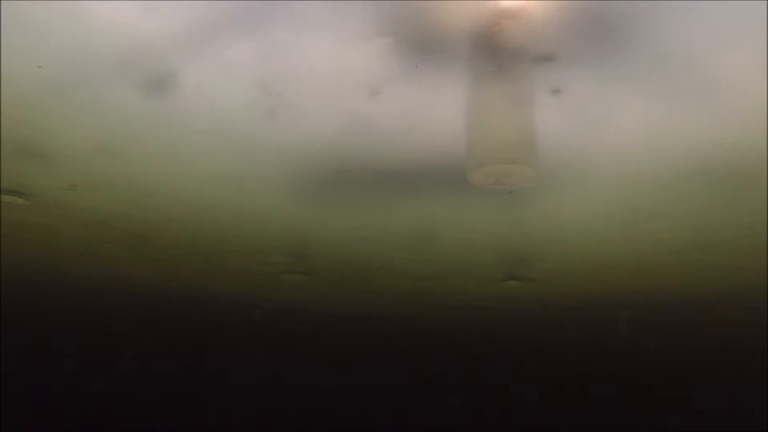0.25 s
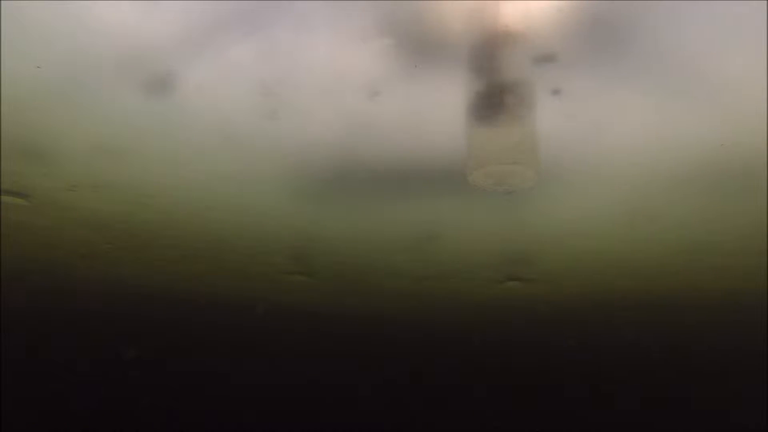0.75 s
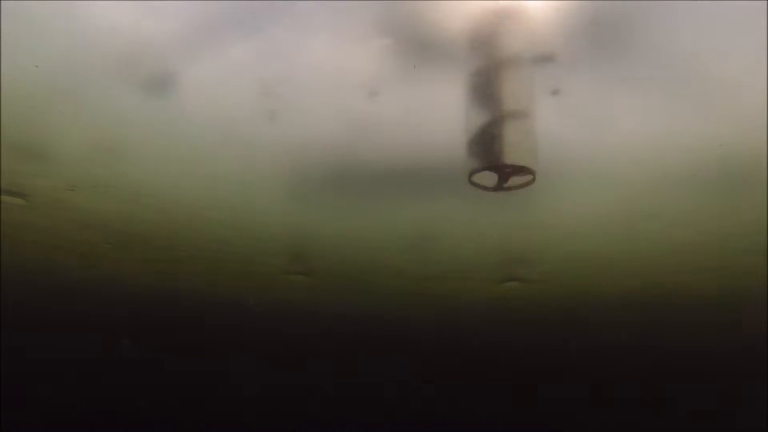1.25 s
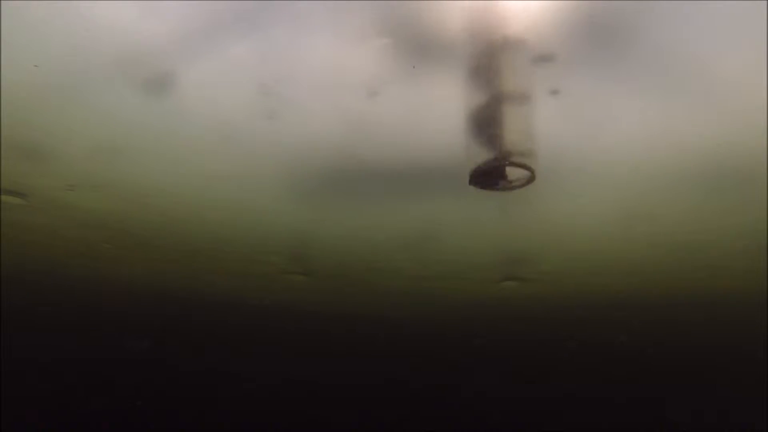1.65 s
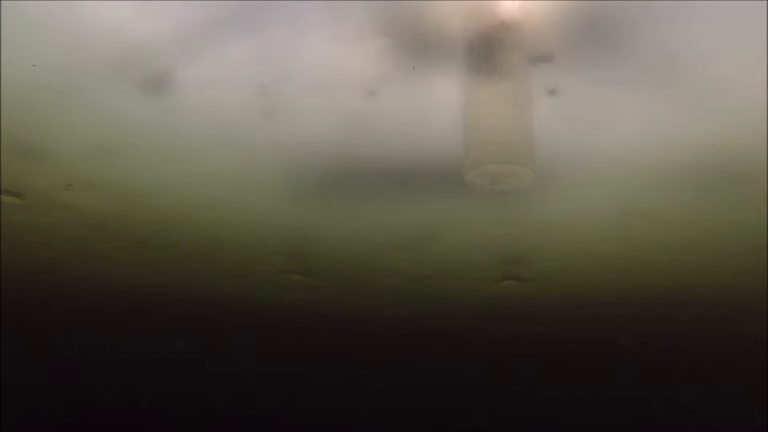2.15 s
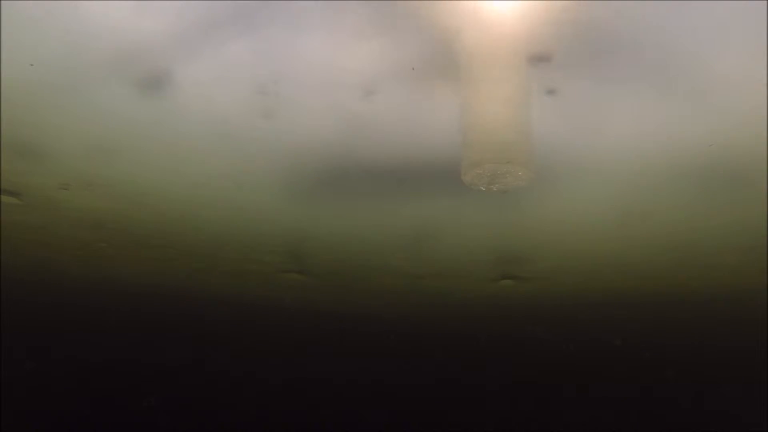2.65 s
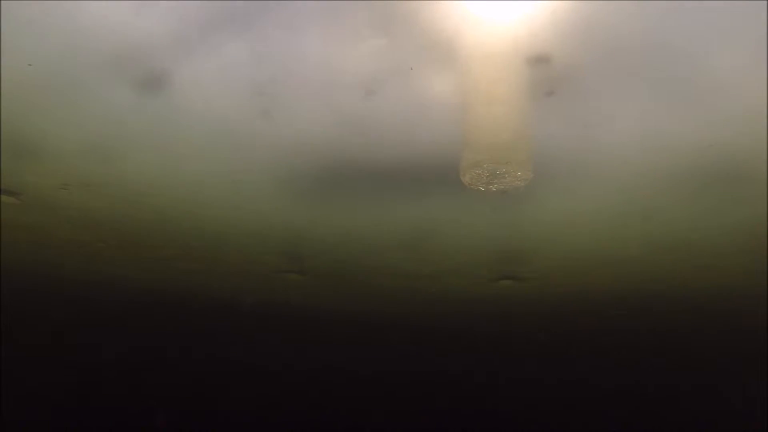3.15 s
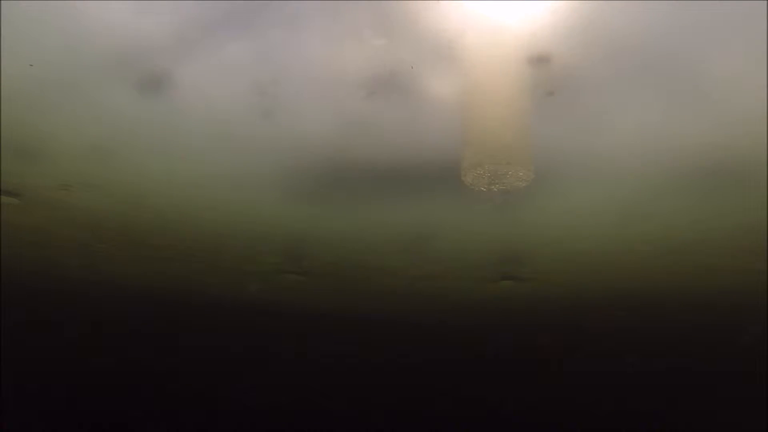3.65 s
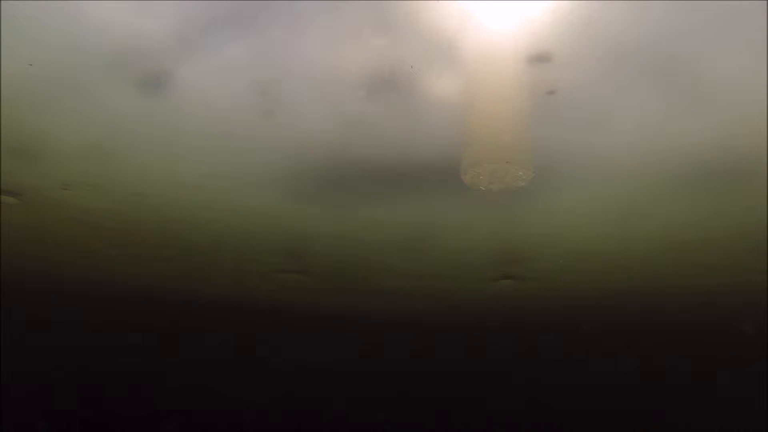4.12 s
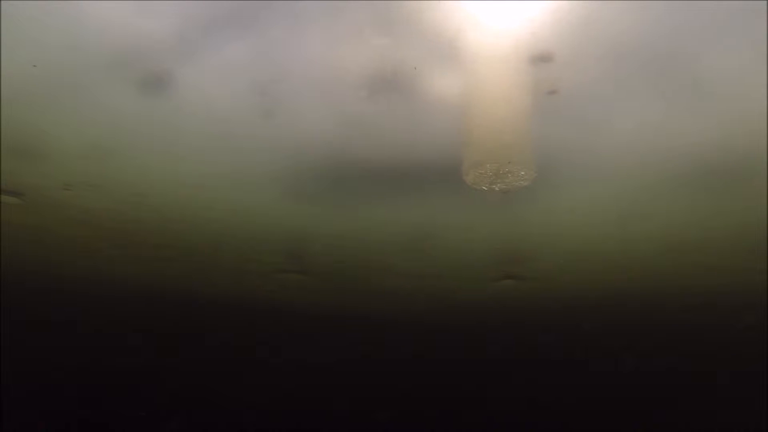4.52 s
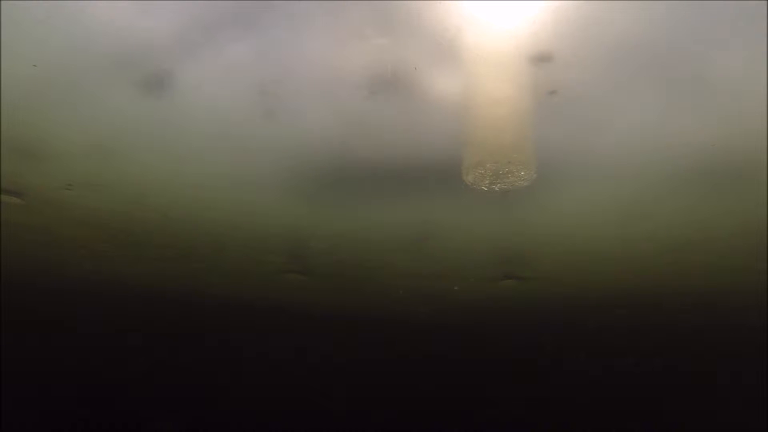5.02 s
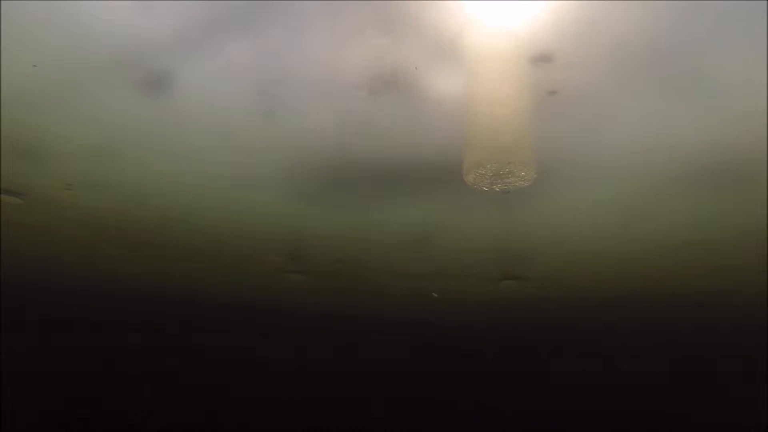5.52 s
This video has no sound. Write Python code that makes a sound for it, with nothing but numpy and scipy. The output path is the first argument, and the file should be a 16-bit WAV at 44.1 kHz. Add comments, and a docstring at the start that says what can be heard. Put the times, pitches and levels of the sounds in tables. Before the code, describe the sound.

Under lake ice, a cased underwater microphone hears a motor auger in its hole. From 0 to about 2.4 s the motor drones with a wavering gear whine, sagging in pitch near 0.4 s, recovering, sagging again near 1.8 s, then speeding up as it is freed. Water churns in thick, hollow gurgles around it, with irregular crunchy ice scrapes, bright crackles and round bubble plops. The loudest gulp and plops come at 1.6-2.1 s as the spiral is drawn back up. The motor dies quickly after 2.35 s, with a few small bubbles trailing. What remains is much quieter: soft lapping, faint fizzing slush with brief crackly swishes, strongest at 3.3-3.7 s. A dull, low knock on the case comes at 3.6 s with a tiny scrape. A deep, soft hum swells around 3.8, 4.3, 4.8 and 5.1 s. A small cluster of echoing bubbles glugs near 5.5 s, then near stillness.

```python
"""Under lake ice: a motor auger clears its hole, heard by a cased camera in the water below.
Motor harmonics drone and whine; filtered bubble clouds churn; bursts of clicks scrape the hole wall.
The spiral is drawn out. Slush, made of dense clicks, hisses over lapping water and something knocks.
A low harmonic hum comes and goes, and a last few bubbles glug as decaying sines with echoes."""
import sys
import numpy as np
from scipy import signal
from scipy.fft import rfft, irfft
from scipy.io import wavfile
from scipy.ndimage import uniform_filter1d

SR = 44100
rng = np.random.default_rng(int(sys.argv[2]) if len(sys.argv) > 2 else 0)


def bounce(signal):
    """Save signal as a 16-bit WAV file at the path given by the first command-line argument."""
    frames = np.transpose(np.atleast_2d(signal))
    limited = np.clip(frames, -1, 1)
    pcm = np.round(limited * 32767).astype(np.int16)
    wavfile.write(sys.argv[1], SR, pcm)


N = 254898
TIME_S = np.arange(N) / SR

# Levels are relative: each layer also has mix gains in its function.
# Quiet lake spectrum: freq_hz, level_db
FLOOR_COLOUR = [(20, -24), (60, 2.5), (200, -3.5), (700, -14), (2800, -23.5), (4000, -28.5), (8000, -40.5),
                (15000, -44)]
# Faint sub-bass tone: pitch_hz, level_db
THROB = (19, -46.5)
FLOOR_DB = -51

# Swells of the late hum: start_s, length_s, level_db
HUM_SWELLS = [(3.83, 0.34, -36), (4.31, 0.31, -37.5), (4.83, 0.103, -36.5), (5.06, 0.52, -40.5)]
# Hum harmonics: multiple, level_db
HUM_ORDERS = [(1, 1), (2, -10), (3, -42)]
HUM_HZ, HUM_SETTLES_HZ, HUM_SETTLES_S = 51.8, 50.5, 4.2

# Surges of loose slush in the hole: start_s, length_s, level_db
SWISHES = [(2.25, 0.053, -44.5), (2.49, 0.13, -48), (2.825, 0.12, -43), (3.085, 0.07, -52),
           (3.23, 0.063, -43.5), (3.3, 0.087, -36.5), (3.585, 0.049, -36.5), (3.74, 0.025, -36),
           (3.99, 0.058, -43.5), (4.115, 0.036, -44.5), (4.19, 0.13, -49), (4.94, 0.15, -48.5),
           (5.165, 0.074, -44), (5.305, 0.018, -39)]
# Slush spectrum: freq_hz, level_db
SLUSH_COLOUR = [(40, -64), (170, -2), (300, -2), (600, -8), (850, -1.5), (1300, -4), (2000, -2.5),
                (3000, -1), (3900, -32), (5500, -29.5), (9000, -48.5), (12500, -43), (15000, -40.5)]
# Water lapping in the hole: time_s, level_db
LAPPING = [(2.7, -46), (3.051, -52), (3.28, -41.5), (3.48, -65.5), (3.7, -46), (4.25, -41), (4.799, -47.5),
           (5.5, -41.5), (5.78, -52.5)]
# Lapping spectrum: freq_hz, level_db
LAPPING_COLOUR = [(30, 0), (90, 1), (200, -7.5), (350, 1), (600, -3.5), (900, -6), (1400, -11), (2200, -17),
                  (4000, -58.5)]
FIZZ_DB, SETTLED_S = -56, 5.52  # faint fizz between surges, until the slush has settled

# Push on the case: start_s, level_db, push_s
KNOCK = (3.5932, -8.5, 0.0012)

# Largest single bubbles: start_s, level_db, pitch_hz
GLUGS = [(0.094, -5, 597), (0.098, -1, 357), (0.589, -2, 396), (1.251, -2, 588), (1.268, -4.5, 572),
         (1.35, -4, 572), (1.515, -4.5, 549), (1.595, -5, 575), (1.703, -2, 554), (1.727, -13, 537),
         (1.89, -1, 694), (1.919, -2.5, 604), (1.944, -12, 564), (1.974, -7.5, 710), (2.064, -7, 569),
         (2.425, -16.5, 922), (2.468, -19.5, 963), (2.492, -16, 639), (2.514, -32, 662),
         (2.556, -18.5, 525), (2.686, -34, 653), (2.69, -23.5, 329), (2.845, -27.5, 654), (3.193, -35, 597),
         (3.467, -32.5, 673), (3.526, -32.5, 650), (3.807, -30, 697), (4.257, -28, 715), (5.435, -30, 656),
         (5.459, -19, 620), (5.466, -19.5, 678), (5.479, -17.5, 490), (5.486, -24, 565), (5.502, -21, 678),
         (5.567, -24.5, 640), (5.609, -39.5, 1090), (5.616, -45, 1620), (5.718, -51, 2150)]
# Echoes between ice sheet and lake bed: delay_s, share (signed gain)
ECHOES = [(.0065, 0.16), (.0118, -0.17), (.019, 0.53)]

# Ice scraping on ice and steel: start_s, length_s, level_db, bite_db (extra treble)
SCRAPES = [(0.027, 0.011, -18, -2.5), (0.06, 0.05, -24, -9), (0.153, 0.046, -32.5, 0.5),
           (0.191, 0.012, -25.5, -3), (0.274, 0.026, -28, 3.5), (0.375, 0.0071, -28, -6),
           (0.464, 0.025, -23.5, 0.5), (0.504, 0.04, -27.5, 2.5), (0.576, 0.019, -18, -7),
           (0.642, 0.026, -21, -3), (0.75, 0.034, -27, -0.5), (0.843, 0.039, -31.5, 1),
           (1.022, 0.063, -32, -7), (1.084, 0.08, -17.5, -2.5), (1.229, 0.036, -26, 2.5),
           (1.346, 0.0062, -23.5, 2), (1.399, 0.021, -28.5, -8.5), (1.441, 0.018, -27, 0),
           (1.489, 0.046, -27, -10), (1.587, 0.017, -17.5, -5), (1.636, 0.017, -20.5, -2.5),
           (1.67, 0.011, -20, 5.5), (1.746, 0.0053, -26, 0), (1.772, 0.025, -20.5, 2),
           (1.884, 0.018, -18, -8.5), (1.915, 0.027, -24.5, -7), (1.965, 0.032, -21.5, -9),
           (2.055, 0.017, -24, -5), (2.123, 0.023, -24, 4), (2.188, 0.04, -27, 2),
           (2.343, 0.0054, -26.5, 8), (2.41, 0.016, -25, 4.5), (2.46, 0.018, -32, -6),
           (3.567, 0.019, -32.5, -9), (3.604, 0.091, -36, -4.5), (3.591, 0.011, -29, 4.5),
           (3.733, 0.034, -38, -7), (4.252, 0.014, -33, -3)]
# Scrape spectrum: freq_hz, level_db
SCRAPE_COLOUR = [(40, -20), (170, -10), (300, 1), (600, -3.5), (850, -1.5), (1300, -3), (2000, -6),
                 (3000, -1.5), (3900, -26.5), (5500, -25), (9000, -37.5), (13000, -33.5), (15000, -50)]
# Ringing ice chips: pitch_hz, level_db
CHIPS = [(1560, -8), (2650, -13)]

# Auger motor speed, sagging under load: time_s, rate_hz
MOTOR_SPEED = [(0.0, 91.47), (0.4, 68.53), (0.8, 73.63), (1.05, 83.8), (1.48, 83.77), (1.81, 71.97),
               (2.02, 82.66), (2.25, 92.7), (2.56, 104.4)]
# Gear whine harmonics of the turning rate: multiple, level_db
WHINE_ORDERS = [(3, -20), (4, -8), (5, -2), (6, -7), (7, -1.5), (8, -12), (9, -18.5), (11, -23.5),
                (14, -21)]
LOUD_RATE_HZ = 85.9  # no sag loss from this speed up
LIFT_S, LIFT_TAKES_S = 1.7, 0.16  # spiral pulled back up into the hole; centre of the change
STOP_S, STOP_DB_PER_S = 2.35, 130  # motor dies away

# Water stirred by the spiral and its trapped air pocket: time_s, level_db, pitch_hz
CHURN = [(0.0, -19, 608), (0.55, -18.5, 668), (0.899, -19, 651), (1.25, -17, 591), (1.701, -15, 557),
         (1.83, -16.5, 655), (2.06, -23, 633), (2.24, -20.5, 686), (2.42, -24.5, 584), (2.721, -45, 609.5)]
# Churn spectrum: freq_hz, level_db
CHURN_COLOUR = [(30, -26.5), (90.0, -7), (170.0, -15), (300.0, -6.5), (600.0, -8), (850.0, -7),
                (1300.0, -16), (2000.0, -21), (3000.0, -23), (3900.0, -51.5), (5500.0, -56),
                (9000.0, -70.5), (13000.0, -67), (15000.0, -78.5)]
# Big gulps of air dragged under: start_s, length_s, level_db
GULPS = [(0.03, 0.025, -28), (0.21, 0.12, -28), (0.58, 0.12, -18.5), (1.635, 0.077, -11.5),
         (1.74, 0.13, -19.5), (1.91, 0.09, -20), (2.08, 0.053, -24), (2.19, 0.065, -28)]
WAKE_DB, LIFTED_WAKE_DB = -1.5, 2.5  # surge behind each scrape, relative to it; extra once lifted

# Camera case resonances, for churn, scrapes and slush: centre_hz, half_width_hz, gain_db
CASE = [(153.6, 28.5, 10.5), (326.6, 14.5, 1), (424.4, 57, 4), (588, 56.4, 8.5), (664.6, 34.6, 12),
        (763, 57.6, 5.5), (971, 17.6, 6.5), (1187, 56, 7), (1513, 45, 10), (1654, 65, 7.5), (2058, 65, 4.5),
        (2223, 34, 7.5), (2456, 56, 5.5), (2660, 54, 3.5), (3215, 58, 5.5), (3540, 67, 5.5), (4094, 120, 7),
        (4480, 790, 7), (6360, 300, 12), (7780, 560, 7.5), (9330, 470, 12), (12400, 490, 7.5)]
EDGE_HZ = 15300


def amp(db):
    """Amplitude ratio from dB."""
    return 10 ** (np.asarray(db) / 20)


def evened(x):
    """Scales to unit RMS."""
    return x / np.sqrt(np.mean(x ** 2) + 1e-20)


def add(mix, start_s, sound):
    """Adds a sound in place, cut at the end of the mix."""
    part = mix[max(round(start_s * SR), 0):][:len(sound)]
    part += sound[:len(part)]


def level(time_s, db):
    """Gain along a dB curve, fading out beyond its ends."""
    outside_s = np.maximum(time_s[0] - TIME_S, 0) + np.maximum(TIME_S - time_s[-1], 0)
    return amp(np.interp(TIME_S, time_s, db)) * np.exp(-outside_s / 0.14)


def ramp(centre_s, takes_s):
    """Linear rise from 0 to 1 around a moment."""
    return np.clip((TIME_S - centre_s) / takes_s + 0.5, 0, 1)


def strokes(rows, attack_s, slope_db, release_s, attack_share=0):
    """Gain of events that rise, tilt by slope_db and die away; attack_share slows long ones."""
    out = np.zeros(N)
    for start_s, length_s, db in rows:
        rise_s = attack_s + attack_share * length_s
        t = np.arange(-rise_s / 2, length_s + 10 * release_s, 1 / SR)
        hold = amp(db + slope_db * np.clip(t / length_s, 0, 1))
        attack = np.clip(t / rise_s + 0.5, 0, 1)
        release = np.exp(-np.maximum(t - length_s, 0) / release_s)
        add(out, start_s - rise_s / 2, hold * attack * release)
    return out


def wander(rate_hz):
    """Slow random drift of about unit size, bounded to +-2."""
    rolloff = 1 + (np.fft.rfftfreq(N, 1 / SR) / rate_hz) ** 4
    drift = evened(irfft(rfft(rng.standard_normal(N)) / rolloff, N))
    return 2 * np.tanh(drift / 2)


def band(x, lo_hz, hi_hz):
    """Butterworth band-pass."""
    edges_hz = [lo_hz, min(hi_hz, SR * 0.49)]
    return signal.sosfilt(signal.butter(3, edges_hz, "band", fs=SR, output="sos"), x)


def through_case(x, colour):
    """Minimum-phase filter: a broad colour plus the ringing of the case."""
    freq_hz = np.fft.rfftfreq(8192, 1 / SR)
    colour_hz, colour_db = np.transpose(colour)
    db = np.interp(np.log(freq_hz + 1), np.log(colour_hz), colour_db)
    for centre_hz, half_width_hz, gain_db in CASE:
        db = db + gain_db * np.exp(-((freq_hz - centre_hz) / half_width_hz) ** 2)
    log_gain = np.log(amp(np.r_[db, db[-2:0:-1]]))
    taps = np.fft.ifft(np.exp(np.conj(signal.hilbert(log_gain)))).real
    return signal.oaconvolve(x, taps[:len(freq_hz)])[:N]


def steadied(x, lo_hz, hi_hz, span_s):
    """Scales x to unit running level within a band."""
    size = max(int(span_s * SR), 2)
    power = uniform_filter1d(uniform_filter1d(band(x, lo_hz, hi_hz) ** 2, size), size)
    return x / np.sqrt(abs(power) + 1e-20)


def clicks(per_s, spread_db):
    """Random snaps of either sign, their dB levels spread by an exponential draw."""
    size = amp(spread_db * np.minimum(rng.exponential(1, N), 4))
    return size * rng.choice([-1, 1], N) * (rng.random(N) < per_s / SR)


def bubble(pitch_hz, cycles, rise, swell_cycles=0.29):
    """A bubble swells, then rings for a few cycles, its pitch climbing."""
    turns = np.arange(int(8 * cycles / pitch_hz * SR)) * pitch_hz / SR
    ring = np.sin(2 * np.pi * turns * (1 + rise * turns / cycles))
    return ring * np.exp(-turns / cycles) * (1 - np.exp(-turns / swell_cycles))


def bubbles(lo_hz, hi_hz, per_s, cycles, spread_db, count):
    """A cloud of bubbles of `count` sizes between two pitches, at unit RMS."""
    cloud = np.zeros(N)
    for pitch_hz in np.geomspace(lo_hz, hi_hz, count):
        births = clicks(per_s / count, spread_db) * pitch_hz
        cloud += signal.oaconvolve(births, bubble(pitch_hz, cycles, rise=0.013))[:N]
    return evened(cloud)


def tone(rate_hz, orders, waver, flutter_db):
    """Harmonics of a wavering rate, each fluttering in level."""
    turns = np.cumsum(rate_hz * (1 + waver * wander(16.3))) / SR
    out = np.zeros(N)
    for multiple, db in orders:
        gain = amp(db + flutter_db * wander(12))
        out += gain * np.sin(2 * np.pi * (round(multiple) * turns + rng.random()))
    return out


def resonate(x, pitch_hz, width_hz):
    """A one-pole resonance that follows the curve pitch_hz."""
    turn = np.exp(2j * np.pi * np.cumsum(pitch_hz) / SR)
    pole = np.exp(-np.pi * width_hz / SR)
    return 2 * (turn * signal.lfilter([1 - pole], [1, -pole], x / turn)).real


def scattered(x, t60_s, wet_db):
    """Rough ice scatters each sound into a short diffuse tail."""
    t = np.arange(SR // 5) / SR
    tail = rng.standard_normal(len(t)) * amp(-60 * t / t60_s)
    return x + amp(wet_db) * signal.oaconvolve(x, tail / np.linalg.norm(tail))[:N]


def floor():
    """The quiet lake: coloured noise with a faint throb at the very bottom."""
    colour_hz, colour_db = np.transpose(FLOOR_COLOUR)
    freq_hz = np.fft.rfftfreq(N, 1 / SR)
    colour = amp(np.interp(np.log(freq_hz + 1), np.log(colour_hz), colour_db))
    hush = evened(irfft(rfft(rng.standard_normal(N)) * colour, N))
    throb_hz, throb_db = THROB
    throb = np.sin(2 * np.pi * np.cumsum(throb_hz * (1 + 0.056 * wander(9.6))) / SR)
    return amp(FLOOR_DB) * hush + amp(throb_db + 2 * wander(2)) * throb


def hum():
    """Low, wavering harmonics that come and go after the motor has stopped."""
    pitch_hz = HUM_HZ + (HUM_SETTLES_HZ - HUM_HZ) * ramp(HUM_SETTLES_S, 0.1)
    drone = tone(pitch_hz, HUM_ORDERS, waver=0.016, flutter_db=1.0)
    return amp(2.5) * strokes(HUM_SWELLS, attack_s=0.22, slope_db=-0.6, release_s=0.059) * drone


def slush():
    """Ice crumbs rub and crackle, brighter when they rush, while water laps and burbles."""
    surge = strokes(SWISHES, attack_s=0.038, slope_db=-1.5, release_s=0.012)
    bed = level([STOP_S, SETTLED_S], [FIZZ_DB, FIZZ_DB])
    crumbs = clicks(per_s=3000, spread_db=3)
    fizz = steadied(through_case(crumbs, SLUSH_COLOUR), 1460, 4100, span_s=0.16)

    treble = evened(band(clicks(per_s=6000, spread_db=4), 4000, 12000))
    rush = surge * (surge / surge.max()) ** 0.21 * treble  # grows faster than the surge

    burble = bubbles(280, 1400, per_s=500, cycles=6, spread_db=2.3, count=24)
    water = band(evened(rng.standard_normal(N)) + amp(-12.5) * burble, 35, 8000)
    lap = steadied(through_case(water, LAPPING_COLOUR), 460, 1300, span_s=0.16)
    lap_gain = np.hypot(level(*np.transpose(LAPPING)), amp(-6.5) * surge)
    return amp(0.5) * np.hypot(surge, bed) * fizz + amp(-26.0) * rush + lap_gain * lap


def knock():
    """A dull push on the case, its rebound and a short noise shudder."""
    start_s, db, push_s = KNOCK
    t = np.arange(SR // 10) / SR
    u = t / push_s
    push = 3 * u * (1 - u / 2) * np.exp(-u)  # turns negative on the rebound
    noise = evened(band(rng.standard_normal(N), 40, 370))[:len(t)]
    shudder = 0.091 * noise * np.exp(-t / 0.01)
    out = np.zeros(N)
    add(out, start_s, amp(db) * (shudder + push))
    return out


def glugs():
    """Large bubbles pinch off one by one and ring; ice and lake bed throw them back."""
    direct = np.zeros(N)
    for start_s, db, pitch_hz in GLUGS:
        cycles = 3 * (pitch_hz / 600) ** 1.15
        add(direct, start_s, amp(db) * bubble(pitch_hz, cycles, rise=0.0054, swell_cycles=4.1))
    out = direct.copy()
    for delay_s, share in ECHOES:
        add(out, delay_s, share * direct)
    return amp(9.5) * out


def scrapes():
    """Each scrape is a burst of tiny fractures that ring the chips; a harder bite adds treble."""
    fractures = clicks(per_s=2200, spread_db=1.5)
    crackle = steadied(through_case(fractures, SCRAPE_COLOUR), 1054, 3400, span_s=0.012)
    snaps = through_case(clicks(per_s=1600, spread_db=1.5), SCRAPE_COLOUR)
    snaps = steadied(snaps, 1500, 3400, span_s=0.079)
    start_s, length_s, db, bite_db = np.transpose(SCRAPES)

    ring = np.zeros(N)
    for pitch_hz, chip_db in CHIPS:
        chip = evened(signal.lfilter(*signal.iirpeak(pitch_hz, 14, fs=SR), crackle))
        ring += amp(chip_db + 3 * wander(9)) * chip  # now one pitch stronger, now the other

    # the blade catches quickly and eases off as the ice gives
    crunch_gain = strokes(np.c_[start_s, length_s, db],
                          attack_s=0.0045, slope_db=-1, release_s=0.0064, attack_share=0.3)
    crunch = crunch_gain * (crackle + ring)
    sparkle_gain = strokes(np.c_[start_s, length_s, db + bite_db],
                           attack_s=0.0026, slope_db=-4.5, release_s=0.006, attack_share=0.11)
    sparkle = sparkle_gain * snaps

    # the two treble bands flicker separately
    middle = band(sparkle, 3300, 7000) * amp(2.5 * wander(18))
    top = band(sparkle, 7300, 19000) * amp(2.5 * wander(8))
    treble = scattered(middle + amp(-4.5) * top, t60_s=0.035, wet_db=-2.5)
    return amp(-2.0) * band(crunch, 30, 3370) + amp(-4.5) * treble


def motor():
    """Drone, octave and gear whine of the turning rate: weaker as load sags it, thinner once lifted."""
    rate_hz = np.interp(TIME_S, *np.transpose(MOTOR_SPEED))
    sag_hz = np.maximum(LOUD_RATE_HZ - rate_hz, 0)
    lifted = ramp(LIFT_S, LIFT_TAKES_S)
    drone = tone(rate_hz, [(1, 0.02)], waver=0.01, flutter_db=0.5)
    octave = tone(rate_hz, [(2, 0)], waver=0.029, flutter_db=7.5)
    whine = tone(rate_hz, WHINE_ORDERS, waver=0.0045, flutter_db=6.5)
    running = amp(-34.0 - 0.58 * sag_hz - 21 * lifted) * drone
    running += amp(-36.5 - 1.1 * sag_hz + 1.6 * lifted) * octave
    running += amp(-22 - 1.1 * sag_hz - 5.6 * lifted) * whine
    return running * amp(-STOP_DB_PER_S * np.maximum(TIME_S - STOP_S, 0))


def swirl():
    """An air pocket carried round by the spiral rings, its pitch wandering as it stretches."""
    time_s, db, pocket_hz = np.transpose(CHURN)
    pitch_hz = np.interp(TIME_S, time_s, pocket_hz) * np.exp(0.08 * wander(7))
    ring = resonate(rng.standard_normal(N), pitch_hz, width_hz=45)
    ring = resonate(ring, pitch_hz, width_hz=90)
    gain = level(time_s, db + 0.2 * (db - db.max()))
    return amp(-6.0) * gain * steadied(ring, 400, 900, span_s=0.086)


def churn():
    """The spiral beats air into water: froth, ringing bubbles, spatter and large wobbling pockets."""
    time_s, db, _ = np.transpose(CHURN)
    lifted = ramp(LIFT_S, LIFT_TAKES_S)
    stir = level(time_s, db) * amp(1.0 * wander(3.7))
    turning = [row[:3] for row in SCRAPES if row[0] < time_s[-1]]  # scrapes while the spiral turns
    wake = strokes(turning, attack_s=0.0062, slope_db=0.5, release_s=0.024)
    wake = amp(WAKE_DB + LIFTED_WAKE_DB * lifted) * wake
    gulps = strokes(GULPS, attack_s=0.02, slope_db=-5.0, release_s=0.031)

    froth = bubbles(283, 967, per_s=1100, cycles=2.45, spread_db=2.0, count=28)
    gurgle = bubbles(300, 1050, per_s=130, cycles=9, spread_db=3, count=24)
    spatter = band(evened(clicks(per_s=3000, spread_db=-3.0)), 895, 16000)
    stirred = through_case(froth + gurgle + amp(15.0) * spatter, CHURN_COLOUR)
    stirred = steadied(stirred, 370, 720, span_s=0.032)

    pockets = bubbles(120.8, 307.8, per_s=200, cycles=2.9, spread_db=0.5, count=14)
    pockets = steadied(through_case(pockets, CHURN_COLOUR), 71, 306, span_s=0.05)
    pocket_gain = np.hypot(amp(-7.5 - 5.3 * lifted) * stir, gulps)

    rumble = evened(band(rng.standard_normal(N), 25, 86))
    rumble_gain = np.hypot(amp(-12.5) * stir, gulps)
    return (amp(-4.0) * np.hypot(stir, wake) * stirred
            + amp(-8.5) * pocket_gain * pockets
            + amp(-17) * rumble_gain * rumble)


def scene():
    """Sums all layers into one channel."""
    background = floor() + hum() + slush() + knock() + glugs()
    auger = scrapes() + motor() + swirl() + churn()
    return (background + auger)[None]


def record(dry):
    """Softly rounds off the highest peaks; then the camera's band limit."""
    rounded = dry / (1 + (dry / 0.85) ** 6) ** (1 / 6)
    low_pass = signal.firwin(511, EDGE_HZ, window=("kaiser", 9), fs=SR)
    return signal.oaconvolve(rounded, low_pass[None], "same")


dry = scene()
out = record(dry)
bounce(out)
```